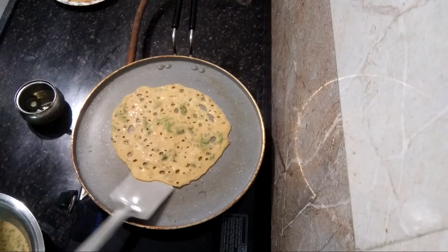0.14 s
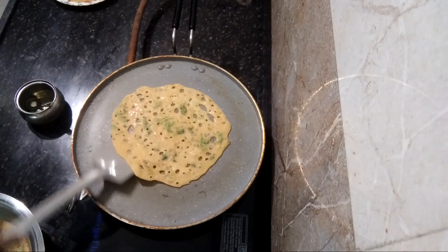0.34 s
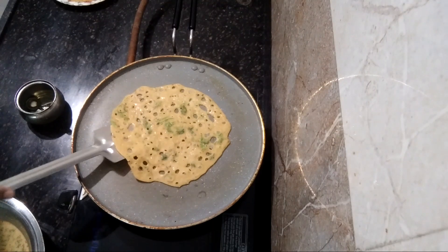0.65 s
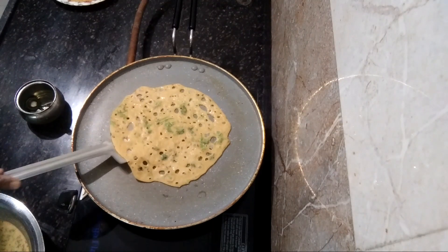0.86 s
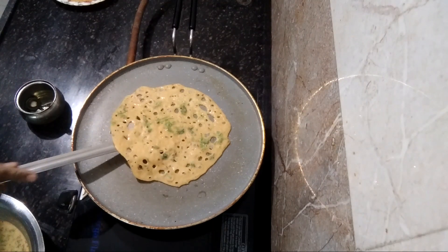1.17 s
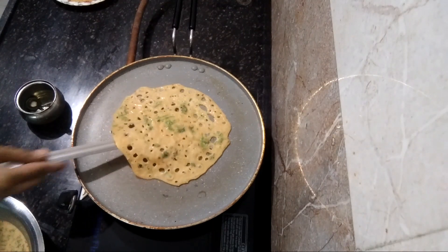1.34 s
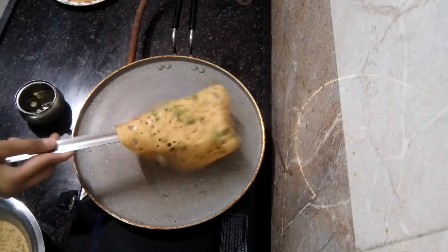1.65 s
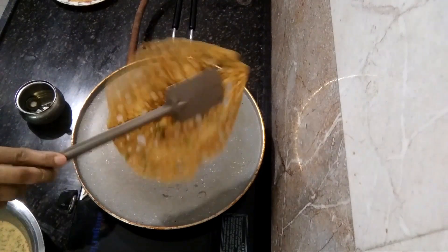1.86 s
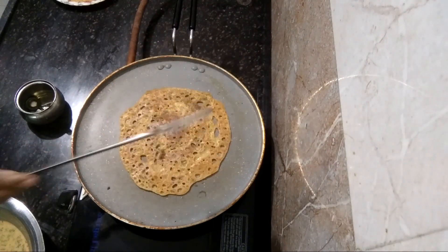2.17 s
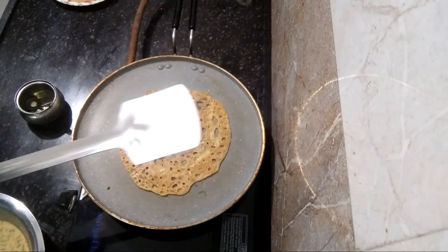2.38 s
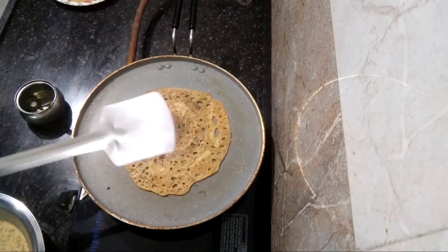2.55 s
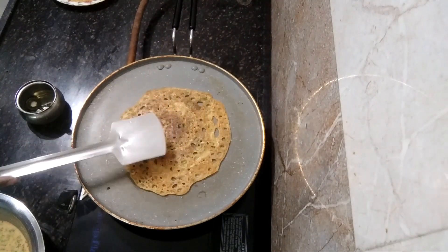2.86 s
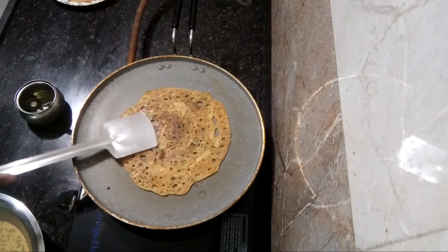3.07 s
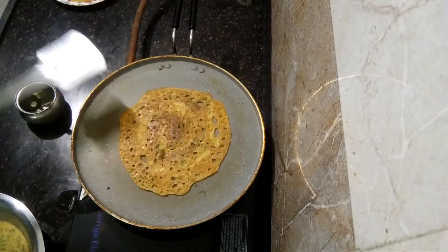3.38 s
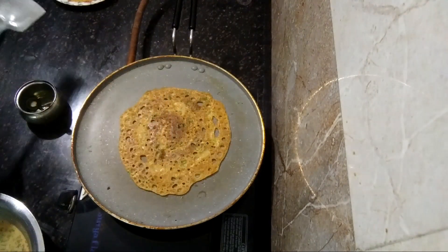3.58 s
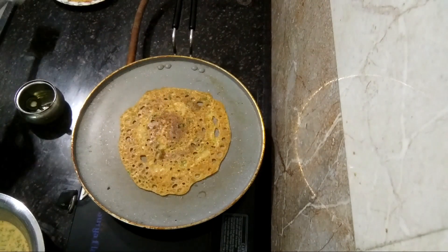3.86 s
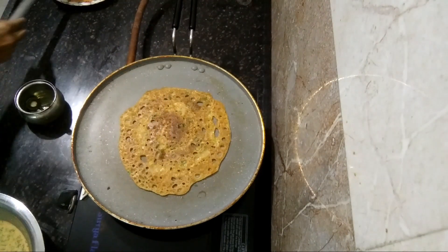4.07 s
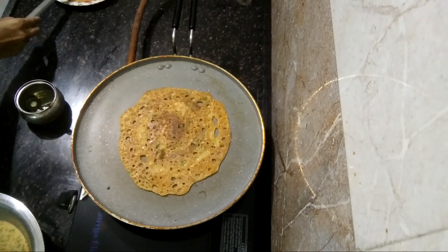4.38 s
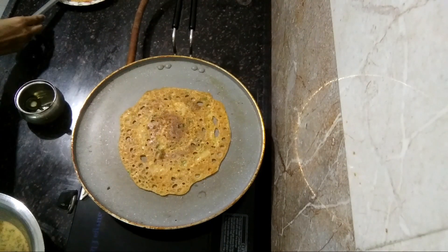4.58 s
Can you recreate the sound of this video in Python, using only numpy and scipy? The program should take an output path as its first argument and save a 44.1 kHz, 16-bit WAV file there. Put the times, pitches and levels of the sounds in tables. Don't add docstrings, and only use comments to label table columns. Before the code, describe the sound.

A close stereo phone hears a pancake frying in a small, fairly dry kitchen. From 0 s a thin, quiet simmer is dotted with crisp droplet snaps and little puffs of steam, busiest around 0.3-1 s. A steel spatula scrapes the pan with short, juddering, metallic rubs near 0, 0.4-0.5, 0.7 and 1 s, then touches down and pushes harder under the pancake at about 1.3-1.4 s. A quieter gap follows. At 1.97 s the pancake lands with a soft slap, a short hollow pan ring and a burst of wet, loud sizzling; a strong spit and light pat follow at 2.13 s. The sizzle drops after about 2.4 s and slowly dries to a finer hiss with occasional faint pops. At 4.6 s a utensil clacks on the counter, rattling over two dull bounces. A wavering low fan hum and soft rushing air continue throughout.

```python
import sys
import numpy as np
from scipy import signal
from scipy.fft import rfft, irfft, next_fast_len
from scipy.io import wavfile
from scipy.ndimage import uniform_filter1d, map_coordinates

SR = 44100
rng = np.random.default_rng(int(sys.argv[2]) if len(sys.argv) > 2 else 0)


def master(y):
    cut = np.clip(np.atleast_2d(y).T, -1, 1)
    pcm = np.round(cut * 32767)
    wavfile.write(sys.argv[1], SR, pcm.astype(np.int16))


def gain_from_db(level_db):
    decades = np.asarray(level_db, float) / 20
    return 10 ** decades


N = 208637


def unit(x):
    return x / np.sqrt(np.mean(x ** 2) + 1e-20)


def along(points, hz):
    f, v = np.transpose(points)
    return np.interp(np.log(hz + 1), np.log(f + 1), v)


def curves(rows, outside=-120):
    s, *columns = np.transpose(rows)
    t = np.arange(N) / SR
    return [np.interp(t, s, column, outside, outside) for column in columns]


def wobble(rate):
    knots = rng.standard_normal(int(N * 400 / SR) + 4)
    return map_coordinates(knots, [np.arange(N) * min(rate, 400) / SR])


def filtered(x, response):
    m = next_fast_len(N + SR // 2)
    return irfft(rfft(x, m) * response(np.fft.rfftfreq(m, 1 / SR)), m)[..., :N]


def modes(table):
    def response(f):
        total = 0
        for k, (centre, width, db) in enumerate(table):
            damping = 1j * f * width
            total = total + (-1) ** k * gain_from_db(db) * damping / (centre * centre - f * f + damping)
        return total
    return response


def sides(pan_db):
    return gain_from_db(np.array([pan_db / 2, -pan_db / 2])).reshape(2, -1)


def spread(pair, spectrum, alike):
    def response(hz):
        turn = np.arccos(np.clip(along(alike, hz), -1, 1)) / 2
        return gain_from_db(along(spectrum, hz)) * [np.cos(turn), np.sin(turn)]
    mid, side = filtered(pair, response)
    return unit(np.array([mid + side, mid - side]))


def bursts(share, spread_db, steam):
    size = gain_from_db(spread_db * np.minimum(rng.exponential(size=N), 4)) * (rng.random(N) < share)
    life = np.exp(-np.arange(120) / 14.0)
    pops = unit(signal.fftconvolve(size, life)[:N] * rng.standard_normal((2, N)))
    return pops + steam * rng.standard_normal((2, N))


# (time [s], fizz level [dB], gurgle over fizz [dB])
SIZZLE_LEVEL = [(1.96, -63, -1), (1.97, -31, -1.5), (2.03, -30, -11.5), (2.15, -30, -12), (2.34, -31, -7),
                (2.59, -36, -10), (3.1, -37, -9), (3.2, -37.5, -12), (3.85, -39, -14), (4.2, -40, -21),
                (4.27, -39, -18), (4.43, -40.5, -14.5), (4.6, -52, -10), (4.61, -39.5, -14),
                (4.73, -48, -13)]
# (frequency [Hz], density [dB per Hz])
FIZZ_COLOUR = [(3240, -10), (5500, -4.5), (7640, -5.5), (13700, 3.5), (14500, -4)]
BOIL_COLOUR = [(1060, -20), (1800, -5), (3260, 1.5), (8000, -1.5), (10400, -0.5), (17600, -120)]
GURGLE_COLOUR = [(180, -64), (300, -22), (351, -14), (444, -5.5), (691, -8), (751, -3), (1070, -1),
                 (1300, -4), (1450, -2.5), (2200, -4), (2860, -5.5), (4840, -120)]
# (frequency [Hz], density [dB per
# Hz])
DROPLET_FLOOR = [(150, -75)]
# (time [s], level [dB])
SIMMER_LEVEL = [(0.0, -55), (0.45, -54), (0.72, -60), (0.87, -57), (1.15, -68), (1.33, -60.5), (1.76, -69),
                (1.96, -70.5)]
# (frequency [Hz], density [dB per Hz])
SIMMER_COLOUR = [(1470, -34), (2500, -9), (2750, -12), (3190, -11), (4570, -6.5), (6270, -9.5),
                 (8790, -2.5), (13500, -3), (14500, -4.5)]
# (frequency [Hz], likeness [0-1])
DROPLET_ALIKE = [(300, 1), (800, 0.42), (2000, 0.13), (6000, 0.047)]


def frying():
    simmer_db, = curves(SIMMER_LEVEL)
    simmer = spread(bursts(0.008, 2, steam=2.2), SIMMER_COLOUR, DROPLET_ALIKE)
    simmer = gain_from_db(simmer_db + 5.5 + 0.8 * wobble(8.1)) * sides(-3.5) * simmer

    fizz_db, wet_db = curves(SIZZLE_LEVEL)
    since = np.maximum(np.arange(N) / SR - SIZZLE_LEVEL[0][0], 0)
    calm_db, splash_s = -38.5, 0.016
    hotter_db = fizz_db - calm_db
    splash_db = 7.5 * np.exp(-since / splash_s)
    follows = np.where(hotter_db > 0, 0.63, 0.67)
    dried_db = 1.6 * (since - 1)
    boil_db = -39.5 + follows * hotter_db - dried_db + splash_db
    pan_db = -8 + 0.24 * np.maximum(hotter_db, 0)
    surge = 0.34 * wobble(14) + 0.67 * wobble(70)

    fizz = spread(bursts(0.009, 1.4, steam=3.4), DROPLET_FLOOR + FIZZ_COLOUR, DROPLET_ALIKE)
    fizz = gain_from_db(fizz_db + 4.0 + surge) * sides(pan_db) * fizz
    boil = spread(bursts(0.008, 1.8, steam=2.6), DROPLET_FLOOR + BOIL_COLOUR, DROPLET_ALIKE)
    boil = gain_from_db(boil_db + 4.5 + surge) * sides(0.09 * pan_db) * boil
    gurgle = spread(bursts(0.004, 3.7, steam=2.5), GURGLE_COLOUR, DROPLET_ALIKE)
    gurgle = gain_from_db(fizz_db + wet_db + surge + 1.1 * wobble(8.97)) * gurgle

    landed = since > 0
    mix = simmer + landed * (fizz + boil + gurgle)
    return filtered(mix, lambda hz: hz ** 4 / (hz ** 4 + 160 ** 4))


# (time [s], peak level [dB], puff t60 [s])
FAT_DROPLETS = [(0.174, -33, 0.091), (0.2044, -44, 0.1), (0.2902, -41, 0.1), (0.3507, -28, 0.1),
                (0.4152, -23, 0.08), (0.5184, -24, 0.09), (0.5583, -31.5, 0.13), (0.6672, -38, 0.082),
                (0.7776, -35.5, 0.064), (0.8421, -26.5, 0.07), (0.95, -31, 0.2), (1.1603, -40.5, 0.2),
                (1.261, -43, 0.1), (1.3194, -42, 0.12), (1.3258, -36, 0.1), (1.8023, -42, 0.1),
                (1.8108, -36.5, 0.28), (1.9684, -14, 0.1)]
# (time [s], peak level [dB], puff t60 [s])
SIZZLE_POPS = [
    (2.132, -6, .02),
    (2.355, -17.5, .02),
    (3.2, -25, .02),
    (3.4, -22, .012),
]
# (time [s], level [dB], t60 [s])
STEAM_PUFFS = [
    (1.315, -40, 0.33),
    (1.546, -43, 0.27),
]


def spits():
    out = np.zeros((2, N + SR))
    t = np.arange(SR // 3) / SR
    pan_db = -4
    for s, db, t60 in FAT_DROPLETS + SIZZLE_POPS:
        t60 = max(t60, 0.004)
        hiss_db = -16 + 3 * np.log2(t60 / 0.093)
        scattered_db = pan_db + 1.5 * rng.standard_normal()
        decay = 0.26 * gain_from_db(-60 * t / 0.0055) + gain_from_db(hiss_db - 60 * t / t60)
        puff = decay * rng.standard_normal((2, len(t)))
        puff[:, :3] = [[0.95, -2.1, 0.69], [-2.5, 1.7, -1.1]]
        puff[1] = np.roll(puff[1], 2)
        out[:, round((s + 0.0006) * SR):][:, :len(t)] += gain_from_db(db + 1.5) * sides(scattered_db) * puff
    for s, db, t60 in STEAM_PUFFS:
        swell = gain_from_db(db - 60 * t / t60) * (1 - np.exp(-t / 0.007))
        out[:, round(s * SR):][:, :len(t)] += swell * sides(pan_db) * rng.standard_normal((2, len(t)))
    return filtered(out[:, :N], modes([(3000, 2200, -13), (10400, 6100, 1.0)]))


# (time [s], pan ring level [dB], slap level [dB])
BLOWS = [
    (1.9684, -29.5, -29),
    (2.128, -43.5, -45),
]
# (frequency [Hz], level [dB], t60 [s])
PAN_MODES = [(427, -0.5, 0.21), (457, 0, 0.37), (610, -19, 0.54), (850, -8, 0.33), (1177, -14, 0.32),
             (1880, 8, 0.026), (2680, -12, .07), (3630, 19.5, 0.023)]
# (frequency [Hz], level [dB], delay [s], t60 [s])
SOFT_FLOP = (295, -43, 0.07, 0.1)


def flip():
    out = np.zeros((2, N))
    t = np.arange(SR // 2) / SR
    ring = 0
    for hz, db, t60 in PAN_MODES:
        ring = ring + gain_from_db(db - 60 * t / t60) * np.cos(2 * np.pi * hz * (t - 0.016))
    ring = ring * (1 - np.exp(-t / 0.0035))
    for s, ring_db, slap_db in BLOWS:
        slap = np.diff(rng.standard_normal((2, len(t) + 1))) * gain_from_db(-60 * t / 0.032)
        out[:, round(s * SR):][:, :len(t)] += gain_from_db(ring_db) * ring + gain_from_db(slap_db) * slap
    hz, db, delay, t60 = SOFT_FLOP
    flop_db = db - 60 * abs(t - delay) / t60 + 3.8 * wobble(40)[:len(t)]
    flop = gain_from_db(flop_db) * np.sin(2 * np.pi * hz * t) * (1 - np.exp(-t / 0.02))
    out[:, round(BLOWS[0][0] * SR):][:, :len(t)] += flop
    return out


# (full pressure [s], lift [s], level [dB], rise [dB/s], blade over pan [dB])
RIM_STROKES = [
    (0.0, 0.01, -44.5, 300, -13.5),
    (0.368, 0.508, -47, 158, -12),
    (0.456, 0.462, -50, 900, 0),
    (0.692, 0.77, -51.5, 350, -14.5),
    (0.98, 1.06, -52.5, 700, -12),
    (1.13, 1.25, -58, 150, -24),
]
# (full pressure [s], lift [s], level [dB], rise [dB/s], blade over pan [dB])
UNDER_STROKES = [
    (1.261, 1.28, -51.5, 1500, 1),
    (1.335, 1.345, -41, 164, -4),
    (1.38, 1.41, -41, 200, -11),
    (1.44, 1.56, -59.5, 300, -13),
]
# (frequency [Hz], width [Hz], level [dB])
RIM_MODES = [(458, 20, 1), (553, 42, 0), (838, 15, 3), (916, 57, -2), (1000, 26, 4.5), (1115, 60, -13),
             (1710, 25, -7), (2330, 170, -11.5), (2730, 54, -7), (2860, 50, -2), (3540, 57, -15),
             (4190, 200, -15)]
UNDERSIDE_MODES = [(450, 16, 4.5), (586, 100, -5.5), (849, 19, 1.5), (1014, 63, 0), (1102, 76, -2.5),
                   (1360, 110, -13.5), (1835, 26, -3), (2230, 150, -15), (2430, 31, 0.5), (2760, 67, -5),
                   (3400, 530, -29), (4160, 230, -14.5), (4720, 400, -18), (6600, 6300, -29.5)]


def stroke(rows, table, judder_db):
    t = np.arange(N) / SR
    drags = []
    for full, lift, db, rise, _ in rows:
        onset_db = rise * np.maximum(full - t, 0)
        sag_db = 25 * np.maximum(t - full, 0)
        release_db = 254 * np.maximum(t - lift, 0)
        drags.append(db - onset_db - sag_db - release_db)
    drags = np.where(t > rows[0][0] - 0.004, drags, -120)
    pan_db = np.maximum(np.max(drags, axis=0), -70)
    blade_db = np.max([drag + row[-1] for drag, row in zip(drags, rows)], axis=0)
    rub = rng.standard_normal((2, N)) * gain_from_db(judder_db * wobble(70))
    rub[1] = 0.65 * rub[0] + 0.5 * rub[1]
    pan = modes([m for m in table if m[0] < 1300])
    blade = modes([m for m in table if m[0] >= 1300])
    low = unit(filtered(rub, lambda hz: pan(hz) * abs(pan(hz)) ** 0.36))
    high = unit(filtered(rub, blade))
    return gain_from_db(pan_db) * low + gain_from_db(blade_db + 3.0) * high


# (frequency [Hz], width [Hz], level [dB])
UTENSIL_MODES = [(844, 24, -8), (2230, 200, -8.5), (2775, 57, -1.5), (3440, 150, -7), (4200, 140, -5.5),
                 (5020, 360, -11), (5750, 250, -10.5), (6900, 1900, -18), (8900, 860, -12.5),
                 (11900, 6200, -23)]
# (frequency [Hz], width [Hz], level [dB])
COUNTER_MODES = [(338, 55, 11), (386, 29, 8)]
# (time [s], level [dB])
BODY_THUDS = [
    (4.632, -44.5),
    (4.66, -41.5),
]


def knock():
    t = np.arange(N) / SR
    knock_s, lead_in_s = 4.6108, 0.007
    since = np.maximum(t - knock_s, 0)
    crack = gain_from_db(-30.5 - 60 * since / 0.057) / 2
    dying = gain_from_db(-38 - 60 * since / 1.5)
    shake = np.where(t < knock_s, gain_from_db(-55), crack + dying)
    bumps = [db - 450 * np.maximum(s - t, 0) - 380 * np.maximum(t - s, 0) for s, db in BODY_THUDS]
    thud_db = np.maximum(np.max(bumps, axis=0), -57)
    chatter = rng.standard_normal((2, N)) * gain_from_db(0.91 * wobble(150))
    steel = modes(UTENSIL_MODES)
    rattle = shake * gain_from_db(5) * unit(filtered(chatter, lambda hz: steel(hz) * abs(steel(hz)) ** 0.27))
    thud = gain_from_db(thud_db) * unit(filtered(chatter[0], modes(COUNTER_MODES)))
    return (t > knock_s - lead_in_s) * (rattle * sides(-1.2) + thud)


# (time [s], second order level [dB], first order over it [dB])
HUM_ORDERS = [(0.0, -43, -28), (0.22, -60, 6), (0.63, -46, -14), (0.74, -51.5, 2), (0.84, -50.5, -6),
              (1.12, -46, -8.5), (1.94, -53.5, -11), (2.08, -63.5, 3), (2.4, -47, -28), (3.1, -70, 6),
              (3.25, -58.5, -6), (3.53, -75.5, 17), (3.74, -51.5, -12), (3.85, -72, 12), (4.2, -56.5, -6),
              (4.42, -76, 8), (4.57, -52.5, -6), (4.73, -75, 23)]
# (frequency [Hz], rms level [dB])
MOTOR_LINES = [(767, -70), (1213, -80)]
# (time [s], rush level [dB])
DRAUGHT = [(0.0, -67), (0.75, -70), (0.88, -69.5), (1.13, -64), (1.3, -68.5), (1.65, -72.5), (2.2, -68),
           (2.8, -73), (3.7, -69), (3.85, -71), (4.73, -66.5)]
# (frequency [Hz], density [dB per Hz])
RUSH_COLOUR = [(60, -61), (90, -8.5), (130, -18), (200, -13), (280, -14.5), (350, -15.5), (450, -16),
               (640, -20), (810, -11.5), (920, -20.5), (1300, -24), (3000, -24.5), (7000, -40), (9000, -90)]
RUMBLE_COLOUR = [(15, -14), (33, -16), (50, 2), (75, -7), (110, -10), (150, -50)]
# (frequency [Hz], likeness [0-1])
RUSH_ALIKE = [(60, 0.92), (300, 0.91), (700, 0.075), (2000, 0.025)]


def fan():
    t = np.arange(N) / SR
    turns = np.cumsum(96 * (1 + 0.0035 * wobble(4.93))) / SR
    second_db, first_db = curves(HUM_ORDERS, outside=-60)
    rush_db, = curves(DRAUGHT, outside=-65)
    draught_db = rush_db + 70
    third_db = -64 + 0.17 * (second_db + 54) + 1.6 * draught_db + 1.6 * wobble(7)
    orders = [(second_db + first_db, 0.8), (second_db, 0.65), (third_db, 1.1)]
    tone = 0
    for k, (db, rough) in enumerate(orders, start=1):
        swell = gain_from_db(db + 2.5 + 3.06 * rough * wobble(22.23))
        tone = tone + swell * np.sin(2 * np.pi * k * turns + rough * wobble(26))
    for hz, db in MOTOR_LINES:
        tone = tone + gain_from_db(db + 2.5 + 4.0 * wobble(8)) * np.sin(2 * np.pi * hz * t + 1.17 * wobble(20))
    rumble_db = -75 + 0.3 * draught_db - 0.5 * t
    rush = spread(rng.standard_normal((2, N)), RUSH_COLOUR, RUSH_ALIKE)
    rush = gain_from_db(rush_db + 12.5 + 2.25 * wobble(7.2)) * rush
    rumble = spread(rng.standard_normal((2, N)), RUMBLE_COLOUR, RUSH_ALIKE)
    rumble = gain_from_db(rumble_db + 3 + 2.2 * wobble(3.07)) * rumble
    return tone * sides(1.0) + rush + rumble


# (frequency [Hz], t60 [s])
ROOM_DECAY = [(200, 0.32), (2000, 0.062), (12000, 0.3)]


def kitchen(x):
    hz, t, z = signal.stft(rng.standard_normal((2, SR // 2)), SR, nperseg=256)
    decay = gain_from_db(-60 * t / along(ROOM_DECAY, hz)[:, None])
    tail = signal.istft(z * decay, SR, nperseg=256)[1]
    return signal.fftconvolve(x, tail / np.linalg.norm(tail[0]), axes=1)[:, :N]


def scene():
    sizzle = frying()
    droplets, landing = spits(), flip()
    spatula = stroke(RIM_STROKES, RIM_MODES, judder_db=3.0) + stroke(UNDER_STROKES, UNDERSIDE_MODES, judder_db=1.5)
    room = kitchen(gain_from_db(-13) * droplets + gain_from_db(-7) * landing)
    return sizzle + droplets + landing + spatula + knock() + fan() + room


def dropouts(x, quiet_db):
    hz, _, z = signal.stft(x, SR, nperseg=1024)
    band, frame = np.arange(z.shape[1]) // 7, np.arange(z.shape[2])
    start = rng.random((band[-1] + 1, len(frame)))[band]
    quiet = np.sum(abs(z) ** 2, axis=(0, 1)) < gain_from_db(2 * quiet_db)
    reach = np.interp(hz, [1500, 2600, 3100, 7000, 7700], [0, 0.2, 1, 1, 0])[:, None]
    odds = np.where(quiet, 0.045, 0.014) * reach
    lost = uniform_filter1d(1.0 * (start < odds), size=4, axis=1) > 0.01
    return signal.istft(np.where(lost, 0.02, 1) * z, SR, nperseg=1024)[1][:, :N]


def top_cut(x):
    return signal.sosfilt(signal.butter(12, 15570, fs=SR, output="sos"), x)


def record(dry):
    top_hz = 14255
    edge_hz = [top_hz, top_hz + 150, top_hz + 1200]
    x = filtered(dry, lambda hz: gain_from_db(np.interp(hz, edge_hz, [0, -46, -75])))
    x = dropouts(x, quiet_db=-39) - 0.0005
    return top_cut(x)


dry = scene()
out = record(dry)
master(out)
```